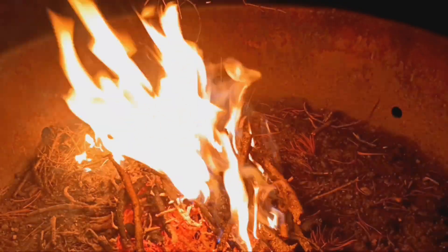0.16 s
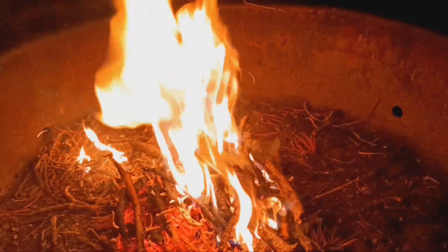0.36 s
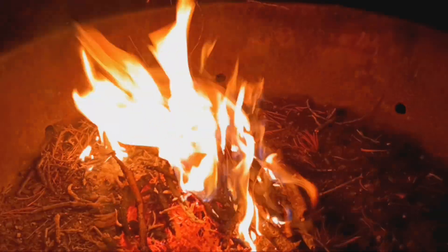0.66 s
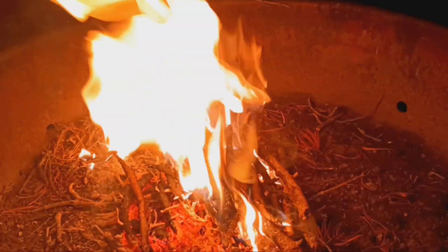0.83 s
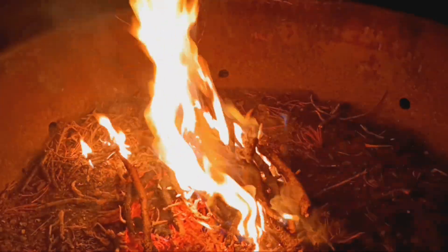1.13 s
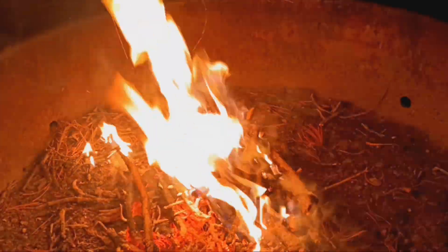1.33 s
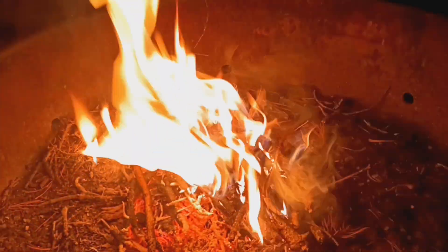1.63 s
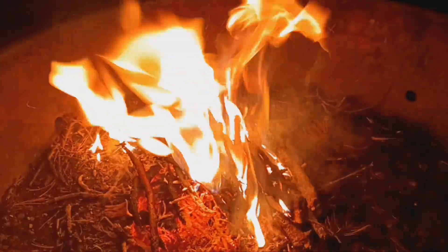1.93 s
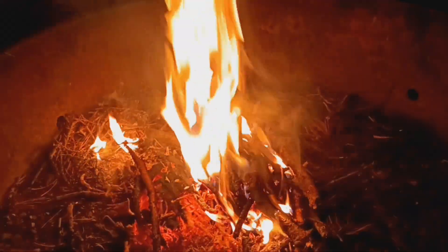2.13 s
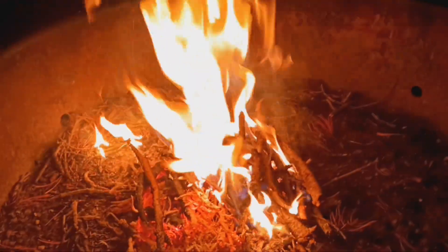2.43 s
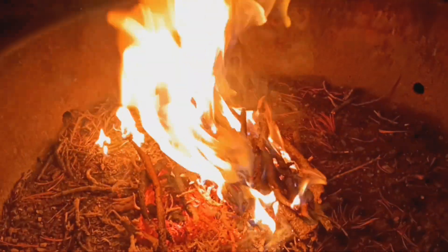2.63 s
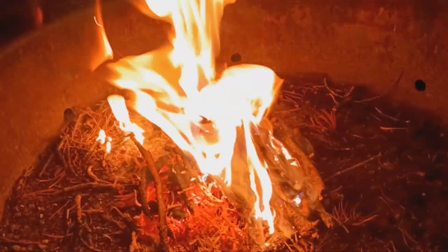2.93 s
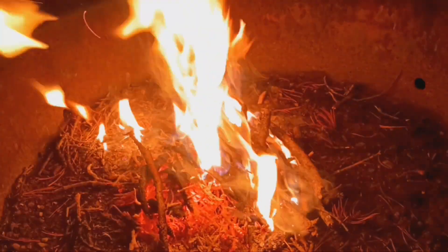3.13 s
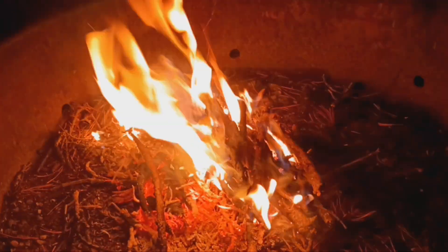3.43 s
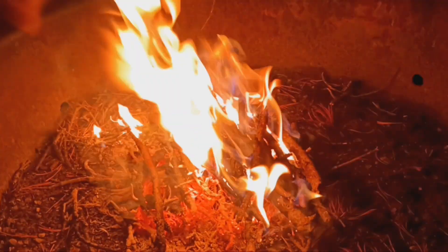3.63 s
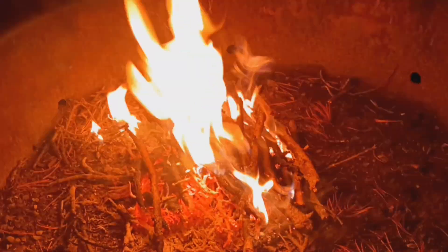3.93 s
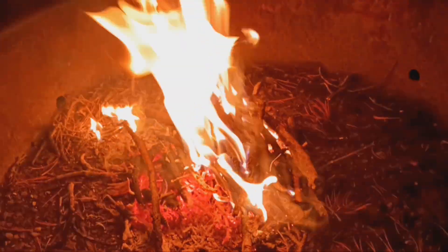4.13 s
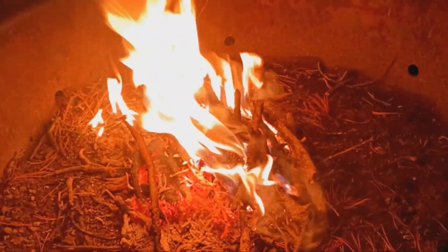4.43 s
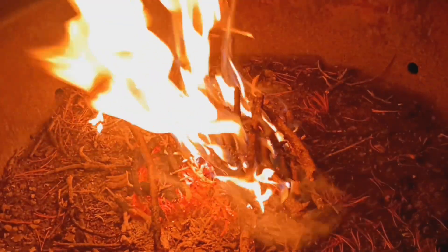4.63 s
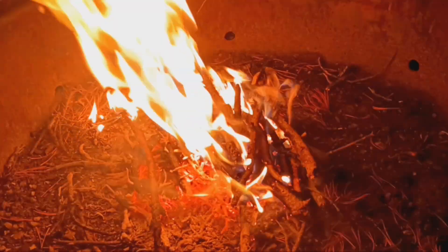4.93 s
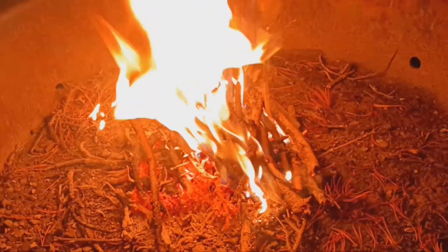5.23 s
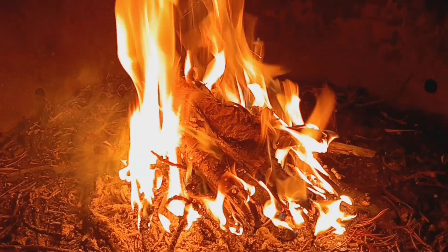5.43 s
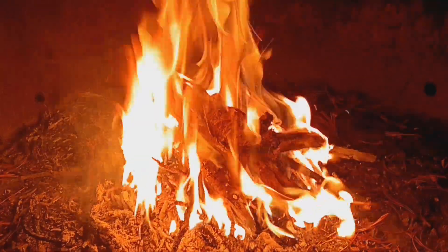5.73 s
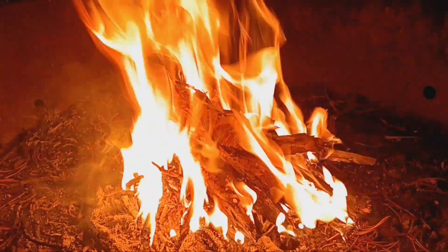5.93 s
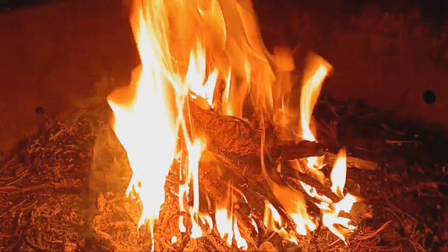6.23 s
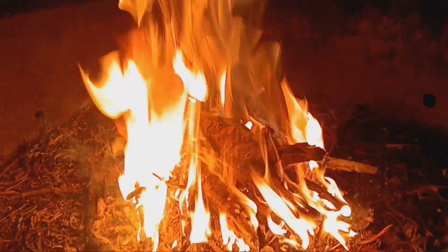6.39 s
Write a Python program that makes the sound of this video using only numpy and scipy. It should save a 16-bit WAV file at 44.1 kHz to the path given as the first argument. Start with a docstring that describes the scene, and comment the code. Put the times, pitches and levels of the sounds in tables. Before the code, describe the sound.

A small night fire of twigs in a round pit, heard close in stereo. Sharp, bright pops and splintery snaps come irregularly over quiet flame flutter and faint ember hiss. Late on, a blunt knock hits the left microphone, then sound cuts out for about a third of a second. It returns with thicker hiss, fine crackle, stronger rumble and a burst of loud cracks.

```python
"""A round fire pit at night: a heap of twigs burns before two spaced microphones.
Sap pockets burst as sharp pops, noise bursts in three ranges that echo off the pit wall.
The flame is low noise that rumbles and flutters in puffs; the embers murmur, hiss and crackle finely.
The right microphone is nearer and bright, the left later and duller.
A knock and a few dry ticks strike single microphones; one silent break interrupts the sound."""
import sys
import numpy as np
from scipy import signal
from scipy.io import wavfile

SR = 44100
rng = np.random.default_rng(int(sys.argv[2]) if len(sys.argv) > 2 else 0)


def wrap_up_sound(samples):
    """Save the sound to the file named by the first command line argument, as 16-bit audio."""
    columns = np.atleast_2d(samples).T
    # keep every value between -1 and 1, then stretch to whole-number steps
    tamed = np.clip(columns, -1, 1)
    steps = np.round(tamed * 32767).astype(np.int16)
    wavfile.write(sys.argv[1], SR, steps)


N = 289296
LEAD_SAMPLES, BURST_SAMPLES = 60, 900   # rising clicks before the main crack; whole burst


def from_db(db):
    """Amplitude gain of a level in dB."""
    return 10 ** (np.asarray(db) / 20)


def rms_one(x):
    """Scale to rms 1."""
    return x / np.sqrt(np.mean(x ** 2) + 1e-20)


def in_time(rows):
    """Columns of a curve, interpolated to one value a sample."""
    s, *columns = np.transpose(rows)
    return [np.interp(np.arange(N) / SR, s, c) for c in columns]


def band(x, low_hz, high_hz, order=2):
    """Butterworth band-pass."""
    sos = signal.butter(order, [low_hz, min(high_hz, .45 * SR)], "band", fs=SR, output="sos")
    return signal.sosfilt(sos, x + 1e-18)


def low_pass(x, hz, order):
    """Butterworth low-pass."""
    return signal.sosfilt(signal.butter(order, hz, fs=SR, output="sos"), x)


def high_pass(x, hz, order):
    """Butterworth high-pass."""
    return signal.sosfilt(signal.butter(order, hz, "high", fs=SR, output="sos"), x)


def drift(corner_hz):
    """Slow random curve of rms 1: noise through two equal poles, computed every 40 samples."""
    r = np.exp(-80 * np.pi * corner_hz / SR)
    noise = rng.standard_normal(N // 40 + 2002)
    slow = signal.lfilter([1], [1, -2 * r, r * r], noise)[2000:]   # settled part
    return np.interp(np.arange(N) / 40, np.arange(len(slow)), rms_one(slow))


def resonate(x, modes):
    """Chain of two-pole resonances (Hz, width Hz, dB), each lifting or, if negative, denting its range."""
    for hz, width_hz, lift_db in modes:
        r = np.exp(-np.pi * width_hz / SR)
        poles = [1, -2 * r * np.cos(2 * np.pi * hz / SR), r * r]
        peak = signal.lfilter([(1 - r * r) / 2, 0, (r * r - 1) / 2], poles, x)
        x = x + (from_db(lift_db) - 1) * peak
    return x


def turbulence(spectrum, alike, patchy_db, flicker_hz):
    """Stereo noise of rms 1 in third-octave bands, whose levels flicker partly together, partly alone."""
    hz, level_db = np.transpose(spectrum)
    edges = np.geomspace(hz[0], hz[-1], 1 + round(3 * np.log2(hz[-1] / hz[0])))
    white = rng.standard_normal((2, 2, N))   # neighbouring bands take different noise
    together, out = drift(flicker_hz), 0
    for k, (low_hz, high_hz) in enumerate(zip(edges, edges[1:])):
        mid, side = band(white[k % 2], low_hz, high_hz)
        band_db = np.interp(np.log(low_hz * high_hz) / 2, np.log(hz), level_db)
        gain = from_db(band_db + patchy_db * (together + drift(flicker_hz)))
        # alike = correlation of the two channels
        out = out + gain * (np.sqrt(1 + alike) * mid + np.sqrt(1 - alike) * side * [[1], [-1]])
    return rms_one(out)


def splinters(t60_s, chance):
    """One burst: a brief swell of faint clicks, the main crack, then weaker uneven ones that die away."""
    clicks_per_s, sharp_t60_s = 1500, .013
    t = (np.arange(chance.shape[1]) - LEAD_SAMPLES) / SR
    shape_db = np.where(t < 0, -12 + 5000 * t, -60 * t / np.clip(t60_s, .002, .045))
    clicks = (chance[0] < clicks_per_s / SR) * np.sign(chance[1] - .5) * chance[2]
    burst = clicks * from_db(shape_db)
    burst[LEAD_SAMPLES] = np.clip(sharp_t60_s / t60_s, .3, 1)   # long bursts have a weaker main crack
    return burst


def pit_tail(x):
    """Scatter by the wall, later by ground and bushes: noise dying band by band, its own at each microphone."""
    # Scattered sound. Each row: centre in Hz, t60 in s, relative level in dB.
    tail_rows = [(556, 0.05, -25), (1300, 0.034, -6.5), (3000, 0.016, -2), (6500, 0.017, -10),
                 (11100, 0.019, -10)]
    far_delay_s, far_t60_ratio, far_db = .014, 3.4, -28
    t, answer = np.arange(SR // 4) / SR, 0
    for hz, t60_s, level_db in tail_rows:
        noise = rms_one(band(rng.standard_normal((2, len(t))), hz / 1.725, hz * 1.532))
        near = from_db(-60 * t / t60_s)
        far = from_db(far_db - 60 * (t - far_delay_s) / (far_t60_ratio * t60_s))
        answer = answer + from_db(level_db - 18.5) * (near + (t > far_delay_s) * far) * noise
    return signal.fftconvolve(x, answer, axes=1)[:, :N]


def pops():
    """Each bursting sap pocket drives a bright crack, a woody snap with its own pitch and a dull thud."""
    # Bursts. Each row: main crack in s, relative crack, snap and thud levels in dB,
    # left minus right in dB (before offsets), snap pitch in Hz, splinter t60 in s.
    pop_rows = [(0.0613, -37, -50.5, -54.5, -9, 1540, .011), (0.075, -38, -45.5, -56, -10, 3460, 0.019),
                (.0866, -34, -47.5, -61, -9, 3700, 0.02), (0.2556, -11, -36.5, -50, -7.5, 5350, 0.018),
                (0.3488, -8.5, -21.5, -27.5, -2.5, 3700, 0.021), (.4739, -27, -51, -79, -26, 4970, 0.024),
                (0.4995, -31.5, -33.5, -51.5, 2, 3400, 0.012),
                (0.5252, -24, -23.5, -24.5, -11.5, 1290, .017),
                (0.5532, -12.5, -25.5, -41, -5, 4200, 0.016), (.6373, -10, -23, -42, -1, 3700, 0.018),
                (0.6628, -14.5, -25, -36.5, -2.5, 4820, 0.015), (0.757, -5.5, -20.5, -31, -7, 5460, 0.015),
                (0.7935, -22.5, -33.5, -44, -5, 4450, .038), (0.8754, -39, -65, -64, -22, 4970, 0.02),
                (.9032, -40, -54, -69, -10, 5160, 0.012), (.9506, -34, -62, -57, -21.5, 1190, .017),
                (0.9771, -19, -23.5, -22, -4.5, 3700, 0.019), (1.0152, -43, -69, -71, -21, 1200, 0.014),
                (1.1179, -41, -37.5, -38.5, 8, 1670, 0.023), (1.2898, -15, -30.5, -54, -7.5, 5240, 0.019),
                (1.7461, -26, -40.5, -41, -18, 4940, .018), (1.8495, -17, -35, -49, -5.5, 4100, .037),
                (1.9509, -13, -31.5, -51.5, -4.5, 4600, .034), (2.0122, -8, -14.5, -44, -7, 4380, 0.014),
                (2.1545, -13, -27.5, -43.5, -4.5, 3700, 0.013),
                (2.217, -40.5, -58.5, -57, -15, 3040, 0.0086), (2.2953, -8, -30.5, -50, -12, 3150, 0.0062),
                (2.3464, -61, -54.5, -49.5, -14, 1590, 0.017),
                (2.4635, -35.5, -68.5, -70.5, -13, 1410, 0.018), (2.5353, -20, -28, -48, -10.5, 4420, .029),
                (2.647, -34.5, -57, -87, -22, 3600, 0.031), (2.7264, -36, -45, -72.5, -13.5, 4500, .039),
                (2.742, -18.5, -26.5, -43, -16.5, 4180, .031), (2.7877, -18, -30.5, -74, -29, 4550, 0.023),
                (2.9377, -12.5, -28.5, -44.5, -11, 4500, 0.019),
                (2.9949, -7.5, -21, -35.5, -6, 3060, 0.015), (3.132, -72, -37.5, -44, -12.5, 1536, 0.036),
                (3.1623, -38.5, -70, -62, -17.5, 1200, 0.012), (3.2961, -58, -58, -77.5, -10, 2645, .021),
                (3.308, -59.5, -61.5, -69.5, 6, 2280, 0.046), (3.3357, -17.5, -35, -59, -9.5, 4800, 0.022),
                (3.3685, -19, -27.5, -48.5, -8, 4440, 0.021), (3.5042, -16.5, -29.5, -37, -4, 3150, 0.024),
                (3.6242, -43.5, -55.5, -82, -12.5, 5080, .017), (3.645, -42, -53, -47.5, -27, 1490, 0.031),
                (3.91, -51, -56, -55.5, -6.5, 1613, 0.012), (4.1111, -22, -41.5, -69, -9, 5500, 0.0053),
                (4.172, -25.5, -37.5, -53.5, -17.5, 5840, 0.12),
                (4.3054, -11, -20.5, -38.5, -13.5, 1530, 0.027),
                (4.3273, -9.5, -19, -31.5, -15, 5100, 0.014), (4.4526, -13, -31.5, -50.5, -8, 4840, .016),
                (4.4776, -7, -19, -36, -10, 4950, 0.023), (4.5005, -35.5, -41, -48.5, -4, 1700, 0.022),
                (4.6706, -34.5, -52, -60, -27.5, 3000, 0.021),
                (4.704, -17.5, -24.5, -34.5, -9, 1550, 0.035),
                (4.8729, -7.5, -17, -29.5, -9.5, 4500, 0.0038),
                (4.9337, -7, -16, -33.5, -9.5, 4600, 0.0079), (5.1404, -28.5, -32, -47.5, -10, 5520, 0.026),
                (5.244, -26, -41, -61.5, -16, 4580, 0.017), (5.269, -21.5, -38, -48.5, -5, 4710, 0.017),
                (5.763, -26, -72, -81, -6.5, 5270, 0.017), (5.799, -38, -80, -82, -2, 3630, 0.024),
                (5.8204, -29, -57, -83, -13, 5470, .012), (5.835, -13, -57, -47.5, -8, 5160, 0.015),
                (5.9434, -33, -47, -79, -15, 4760, 0.059), (5.97, -40, -58, -74, -10, 4970, .013),
                (6.011, -33.5, -46, -67, -17, 1220, 0.037), (6.0668, -27.5, -50, -55, -25, 1190, 0.03),
                (6.158, -46, -62, -74, -15, 1200, .015), (6.1871, -18.5, -35.5, -79, -17, 4300, 0.024),
                (6.199, -5.5, -11.5, -20, -9.5, 1110, 0.032), (6.2816, -4, -15, -25, -5, 4860, 0.021),
                (6.2972, -0.5, -10, -17, -4.5, 1060, 0.021), (6.4702, -28.5, -40, -44, -21, 4280, 0.016),
                (6.486, -5.5, -14, -19.5, -10.5, 5800, 0.021), (6.5341, -22.5, -39, -34, -15, 1300, 0.0072)]
    crack_left_db = 12   # the crack spreads more to the left than the snap
    crack, snap, thud = np.zeros((3, 2, N + BURST_SAMPLES))
    chances = rng.random((len(pop_rows), 3, 3, BURST_SAMPLES))
    for row, chance in zip(pop_rows, chances):
        s, crack_db, snap_db, thud_db, pan_db, snap_hz, t60_s = row
        start = round(s * SR) - LEAD_SAMPLES
        at = slice(start, start + BURST_SAMPLES)
        twig = chance[0, 0]
        shared, left, right = [splinters(t60_s, c) for c in chance]
        burst = np.array([.5 * shared + 1.72 * left, .5 * shared + .78 * right])
        burst[0] = np.roll(burst[0], int(7 * twig[0]) - 3)   # each twig lies at its own angle to the pair
        # parts of the range that this twig weakens
        burst = resonate(burst, [(1500 * 8 ** c, 500 * 3 ** c, -12) for c in twig[2:6]])

        top_hz = np.clip(11497 + 450 * (crack_db - snap_db), 8500, 19000)   # weak cracks are duller
        bright = low_pass(burst, top_hz, order=4)
        woody = resonate(burst, [(snap_hz, 900, 6)])
        dull = resonate(burst, [(550 * 1.9 ** twig[1], 250, 5)])   # each thud has a random pitch
        crack[:, at] += from_db([[crack_db + pan_db + crack_left_db], [crack_db]]) * bright
        snap[:, at] += from_db([[snap_db + pan_db], [snap_db]]) * woody
        thud[:, at] += from_db([[thud_db + pan_db / 2], [thud_db]]) * dull
    direct = from_db(-2) * band(crack, 7200, 20000)
    direct = direct + from_db(10.5) * band(snap, 1500, 6000, order=3)
    direct = direct + from_db(16) * band(thud, 590, 1600)
    direct = direct[:, :N]
    return direct + pit_tail(direct)


def flame():
    """Turbulent burning: a deep rumble and a higher flutter, swelling in puffs over a low steady burn."""
    # Flame noise. Each row: frequency in Hz, relative density in dB per Hz.
    rumble_spectrum = [(12, -15.5), (20, -18), (59, -2), (147, -4.5), (172, -6.5), (201, -14), (235, -13),
                       (264, -25), (312, -12.5), (450, -41.5), (580, -63), (990, -120)]
    # Puffs. Each row: time of the height in s, relative deep and flutter levels in dB, length in s.
    puff_rows = [(0.183, -58.5, -65, 0.22), (0.286, -53, -59, 0.23), (0.541, -56, -49, 0.066),
                 (0.646, -54.5, -59.5, 0.1), (0.807, -40, -43.5, .13), (0.952, -60.5, -51.5, 0.1),
                 (1.121, -52, -58, .14), (1.303, -58.5, -59, 0.16), (1.53, -45.5, -57.5, 0.25),
                 (1.72, -64, -50, 0.13), (1.86, -50, -39, 0.059), (2.016, -53, -67, 0.15),
                 (2.14, -57, -65, 0.2), (2.409, -46.5, -54.5, 0.17), (2.59, -51.5, -47.5, 0.078),
                 (2.928, -45.5, -48, 0.16), (3.132, -43, -41, 0.23), (3.23, -48, -56, 0.088),
                 (3.33, -53, -64, 0.085), (3.5, -62, -65, 0.17), (3.7, -54, -52, 0.16),
                 (3.918, -54.5, -68.5, 0.15), (4.123, -67, -64.5, 0.28), (4.298, -68, -55.5, 0.065),
                 (4.491, -64.5, -56, 0.11), (4.632, -57, -57.5, 0.068), (4.865, -55.5, -58.5, 0.12),
                 (5.001, -63, -74, 0.052), (5.24, -47.5, -53.5, 0.16), (5.764, -54, -57, 0.15),
                 (6.03, -41, -43.5, 0.26), (6.12, -45.5, -53.5, 0.092), (6.262, -42.5, -40.5, 0.15),
                 (6.374, -38, -45.5, 0.065), (6.461, -36, -34.5, 0.05), (6.55, -36, -40.5, 0.12)]
    lull_deep_db, lull_flutter_db = -68.5, -69.5   # relative, between the puffs
    puff_fall_db = 15.5   # half a length from the height
    top_hz, split_hz = 239, 110
    t = np.arange(0, N + 40, 40) / SR
    s, deep_db, flutter_db, length_s = np.transpose(puff_rows)[:, :, None]
    swell_db = -puff_fall_db * (2 * (t - s) / length_s) ** 2

    def puff_gain(height_db, lull_db):
        """Sum of all puffs and the steady burn."""
        gain = from_db(lull_db) + from_db(height_db + swell_db).sum(axis=0)
        return np.interp(np.arange(N) / SR, t, gain)

    air = turbulence(rumble_spectrum, alike=.99, patchy_db=1.5, flicker_hz=20)
    air = low_pass(air, top_hz, order=4)
    deep = rms_one(low_pass(air, split_hz, order=3))
    flutter = rms_one(high_pass(air, split_hz, order=3))
    deep = from_db(-1.5) * puff_gain(deep_db, lull_deep_db) * deep
    return deep + from_db(1) * puff_gain(flutter_db, lull_flutter_db) * flutter


def small_crackle(hiss_db):
    """Ticks of burning needles, denser and louder as the hiss grows; each has its own pitch and side."""
    per_s = 2500 * from_db(.8 * (hiss_db + 50) + 4 * drift(8))
    born = rng.random(N) < per_s / SR
    loudness_db = 4.5 * np.minimum(rng.exponential(1, N), 4)
    ticks = born * rng.choice([-1, 1], N) * from_db(loudness_db)
    ticks = ticks * from_db(4 * rng.standard_normal((2, N)))   # uneven between the sides
    pitches_hz, dealt = np.geomspace(6500, 13500, 8), rng.integers(0, 8, N)
    pitched = sum(band(ticks * (dealt == k), hz / 1.3, hz * 2.8) for k, hz in enumerate(pitches_hz))
    direct = from_db(hiss_db - 8) * pitched
    return direct + pit_tail(direct)


def ember_hiss(hiss_db):
    """Flickering treble noise of the embers, nearly independent at the two microphones."""
    # Hiss. Each row: frequency in Hz, relative density in dB per Hz.
    hiss_spectrum = [(3000, -13.5), (5000, -2.5), (7800, -9), (9000, -4), (10000, 3), (11500, 1),
                     (13000, -0.5), (17000, -11)]
    port_lift_db = 20   # allowance for what the right port adds
    noise = turbulence(hiss_spectrum, alike=.1, patchy_db=1.8, flicker_hz=12)
    return from_db(hiss_db - port_lift_db) * noise


def ember_murmur(murmur_db):
    """Flickering mid-range noise of the embers, coloured by resonances of the air in the pit."""
    # Murmur. Each row: frequency in Hz, relative density in dB per Hz.
    murmur_spectrum = [(300, -4.5), (500, -10), (1000, -12), (2000, -14), (4000, -21.5), (7000, -32)]
    # Air in the pit. Each row: mode in Hz, width in Hz, lift in dB.
    pit_modes = [(596, 60, 12), (860, 33, 11.5), (1300, 180, 0.5)]
    noise = turbulence(murmur_spectrum, alike=.2, patchy_db=1.6, flicker_hz=12)
    return from_db(murmur_db + 1) * rms_one(resonate(noise, pit_modes))


def knock():
    """Blow on the left housing: a blunt push with a bounce, its swing back and a slow decaying wobble."""
    s, left_db, right_db, rise_s = 5.2094, -.5, -26, 3 * .00014
    t = np.arange(SR // 5) / SR
    push = (t / rise_s) ** 3 * np.exp(3 - 3 * t / rise_s)   # quick rise, slower release
    push = push + .17 * np.roll(push, 88)   # bounce 2 ms later
    push = high_pass(push, 75, order=1)   # swing back
    wobble = from_db(-25 - 60 * t / .2) * np.sin(2 * np.pi * 38 * t)
    out = np.zeros((2, N + len(t)))
    out[:, round(s * SR):][:, :len(t)] += from_db([[left_db], [right_db]]) * (push - wobble)
    return out[:, :N]


def dry_ticks():
    """Short decaying sines, each on one microphone alone, as from a spark."""
    # Ticks. Each row: start in s, side (0 left, 1 right), relative level in dB, ring in Hz, t60 in s, sign.
    tick_rows = [(1.68, 0, -34.5, 1940, 0.0021, 1), (1.723, 0, -10, 2690, 0.0026, 1),
                 (3.0078, 1, -25, 493, 0.019, -1), (5.302, 1, -12, 830, 0.0052, 1),
                 (6.013, 1, -30, 3000, 0.00055, 1), (6.2136, 1, -3, 2160, 0.00086, -1),
                 (6.4232, 1, 15, 7300, 0.00027, 1), (6.547, 1, 8.5, 6500, 0.00021, 1)]
    t = np.arange(SR // 5) / SR
    out = np.zeros((2, N + len(t)))
    for s, side, level_db, hz, t60_s, sign in tick_rows:
        rise = np.sin(np.pi / 2 * np.minimum(4 * t / t60_s, 1)) ** 2
        swell = rise * from_db(level_db - 60 * t / t60_s)
        out[int(side > .5), round(s * SR):][:len(t)] += np.sign(sign) * swell * np.sin(2 * np.pi * hz * t)
    return out[:, :N]


def microphones(x):
    """Each port has its resonances; the left one lies farther off and shaded from the treble."""
    # Port resonances, one list before and one after the break. Each row: Hz, width in Hz, lift in dB.
    left_port = [
        [(3700, 2000, 7.5), (6420, 506, 17.5), (11000, 1100, -1)],
        [(4500, 730, 1), (7050, 1800, 17.5), (10970, 3800, 7)],
    ]
    right_port = [
        [(7930, 5000, 6.5), (10130, 2300, 11), (8700, 5100, 8.5)],
        [(5870, 870, 7.5), (9240, 1560, 25), (14160, 5500, 5)],
    ]
    shade_hz, shade_db, lag_samples = 8500, -10.5, 46
    moved = round(5.5 * SR)   # the microphones face the fire differently after the break
    dull = low_pass(x[0], shade_hz, order=3)
    shaded = dull + from_db(shade_db) * (x[0] - dull)
    left = np.concatenate([np.zeros(lag_samples), shaded[:-lag_samples]])
    heard = []
    for side, (before, after) in ((left, left_port), (x[1], right_port)):
        heard.append(np.concatenate([resonate(side[:moved], before), resonate(side[moved:], after)]))
    return np.array(heard)


def scene():
    """Pops, flame and embers through both microphones, plus the blows on the microphones themselves."""
    # Embers over time. Each row: time in s, relative murmur level in dB, relative hiss level in dB.
    ember_levels = [(.07, -82.5, -77.5), (.5, -77.5, -68), (.9, -76, -69), (1.5, -80, -75.5),
                    (1.9, -74, -68), (2.3, -79, -68), (2.9, -78.5, -74.5), (3.4, -76.5, -70.5),
                    (3.8, -79.5, -74.5), (4.7, -80, -69.5), (4.9, -77, -68), (5.1, -85, -73.5),
                    (5.3, -58, -62), (5.665, -86, -68.5), (5.8, -70, -55), (5.95, -72.5, -59),
                    (6.2, -74, -53.5), (6.3, -52.5, -48), (6.4, -64.5, -53), (6.55, -58, -53.5)]
    murmur_db, hiss_db = in_time(ember_levels)
    embers = small_crackle(hiss_db) + ember_hiss(hiss_db) + ember_murmur(murmur_db)
    return microphones(pops() + flame() + embers) + knock() + dry_ticks()


def record(dry):
    """Faint amplifier noise; silence at the start and in the break; peaks clipped; the top cut off."""
    # Recording gain. Each row: time in s, linear gain.
    gain_curve = [(0, 0), (.057, 0.045), (.06, 0.97), (5.311, 1), (5.316, 0.02), (5.338, 0.0065),
                  (5.654, 0), (5.66, 0.61), (7, 0.66)]
    noise_db, clip_level, cutoff_hz = -86, .84, 17100   # noise rms before the gain
    noisy = dry + from_db(noise_db) * rng.standard_normal(dry.shape)
    heard = np.clip(noisy * in_time(gain_curve)[0], -clip_level, clip_level)
    return signal.sosfilt(signal.cheby2(16, 80, cutoff_hz, fs=SR, output="sos"), heard)


dry = scene()
out = record(dry)
wrap_up_sound(out)
```